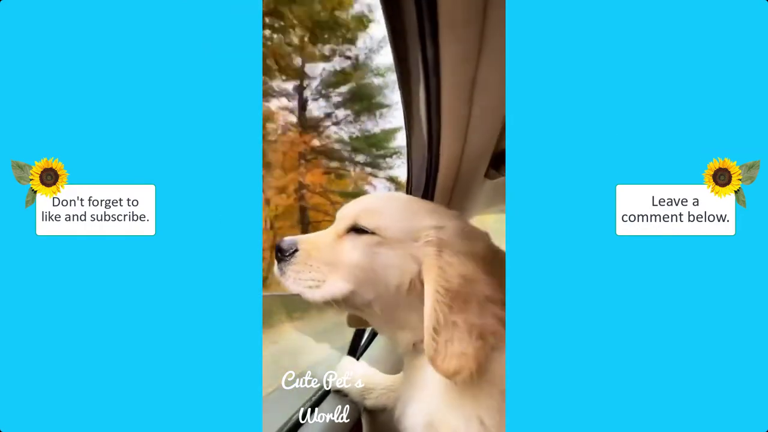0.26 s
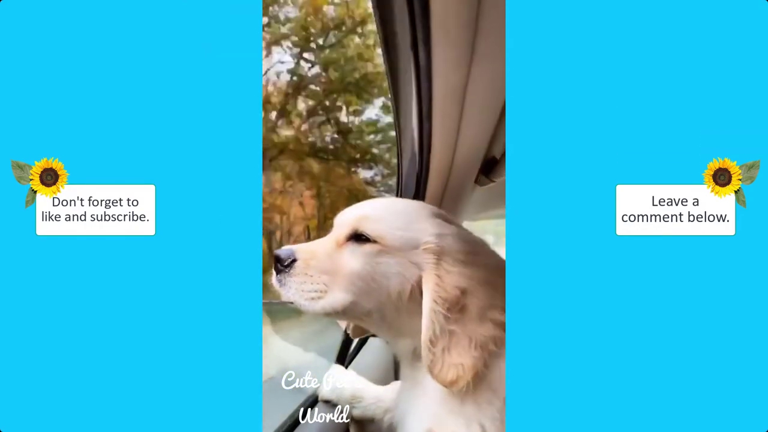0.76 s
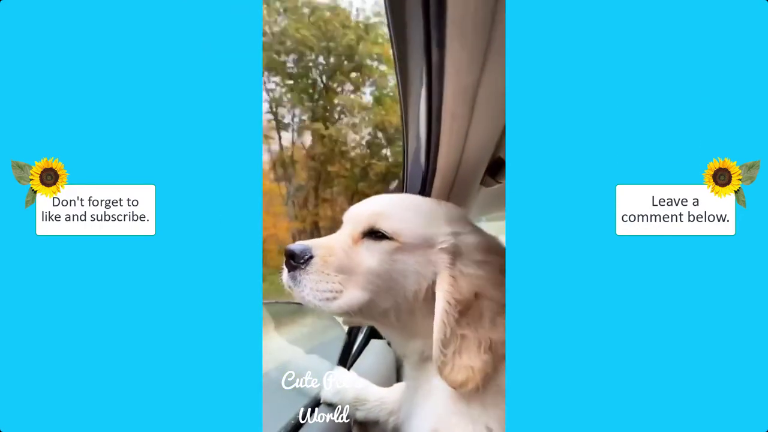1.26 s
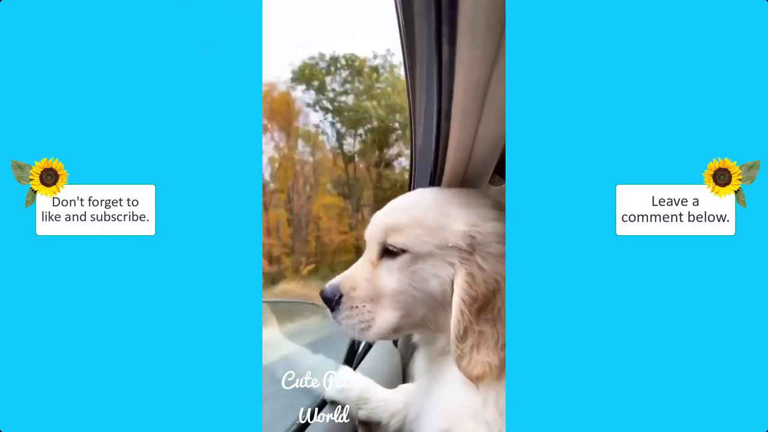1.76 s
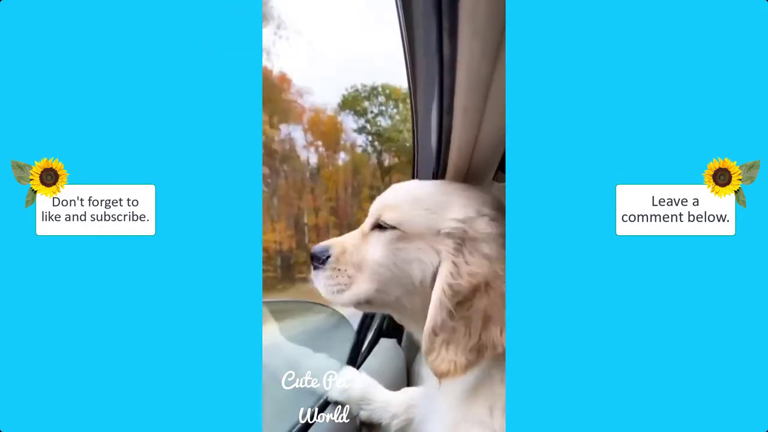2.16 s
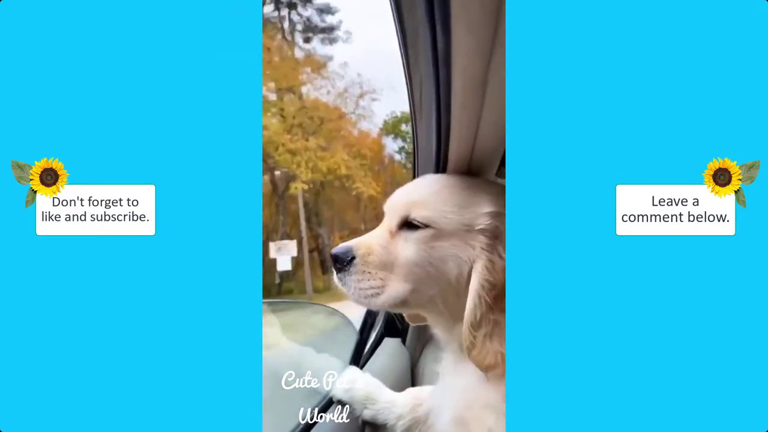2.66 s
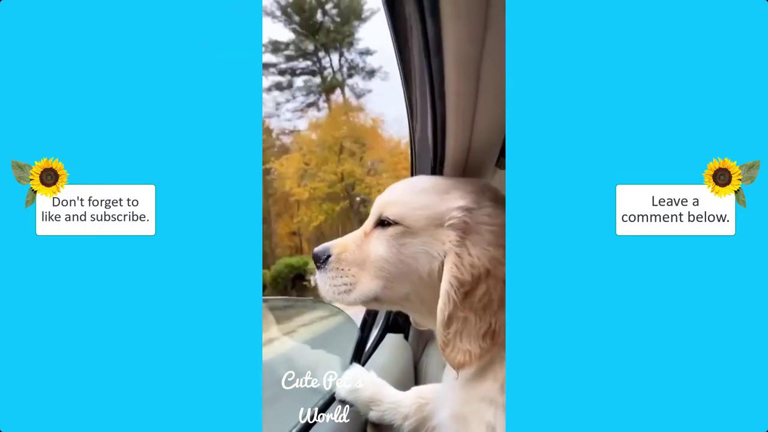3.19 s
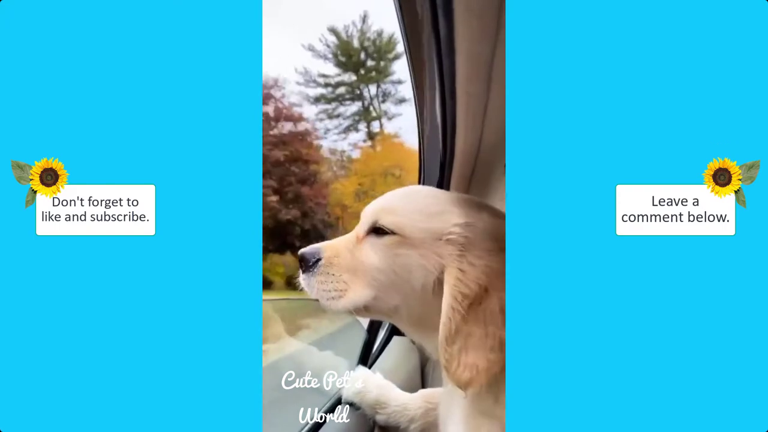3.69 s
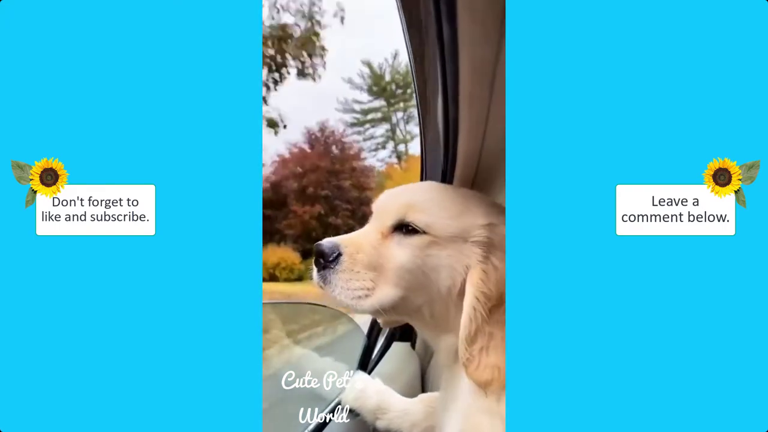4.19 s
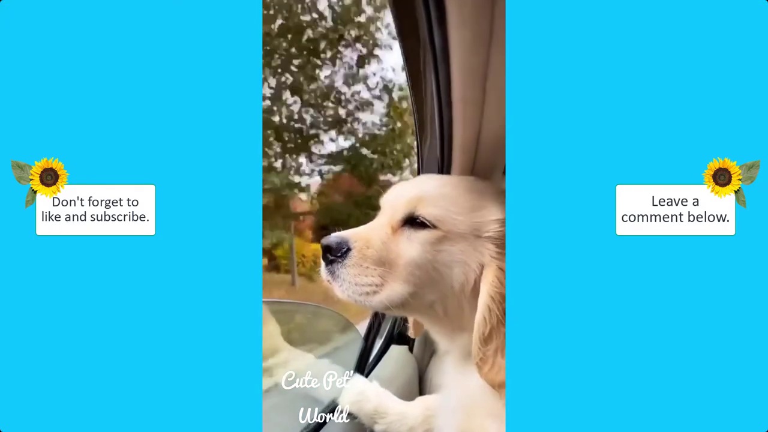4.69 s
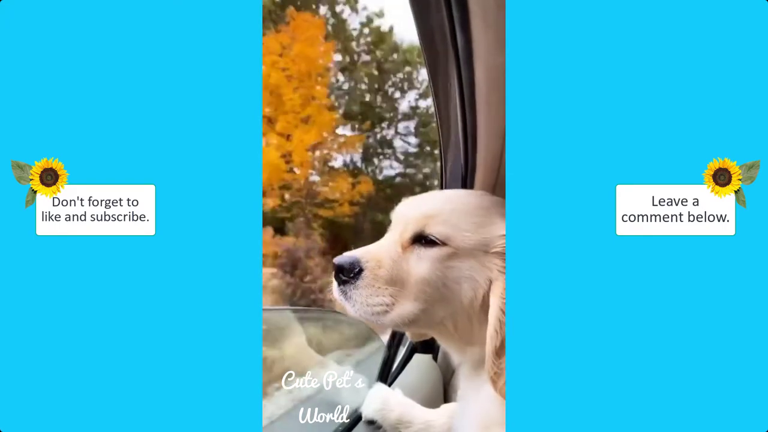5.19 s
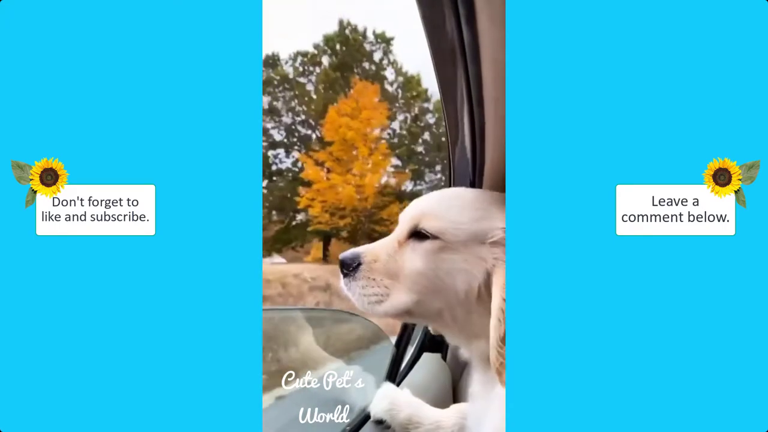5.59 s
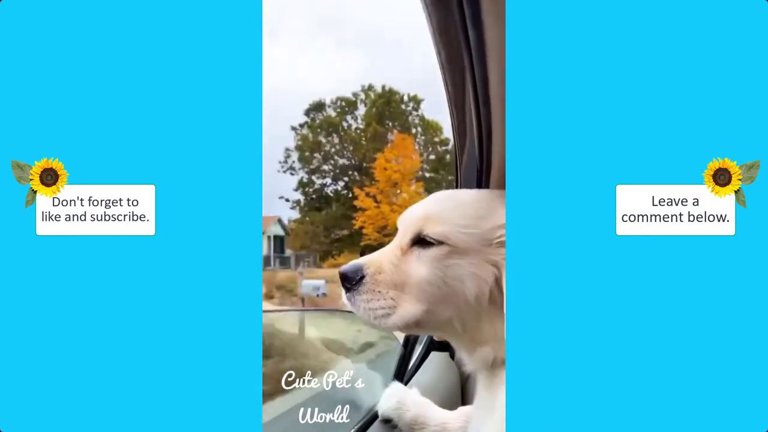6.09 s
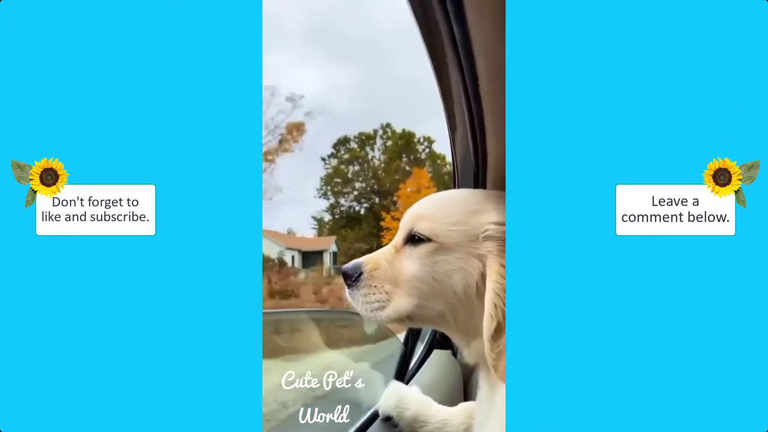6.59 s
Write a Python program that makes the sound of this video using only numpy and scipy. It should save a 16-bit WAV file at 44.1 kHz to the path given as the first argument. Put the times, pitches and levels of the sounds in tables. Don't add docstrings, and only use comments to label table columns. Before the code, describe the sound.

A phone in a car cabin picks up dominant, irregular deep wind buffeting, slightly squeezed at its peaks. Steady tyre rumble and quiet wind hiss sit behind it. A brief hollow rush swells and cuts off at about two seconds. The loose window pane ticks singly at first, knocks hard at three seconds, then chatters late while a thin breathy whistle grows faintly. The dog is silent.

```python
import sys
import numpy as np
from scipy import signal
from scipy.fft import rfft, irfft, next_fast_len
from scipy.io import wavfile
from scipy.ndimage import uniform_filter1d, map_coordinates

SR = 44100
rng = np.random.default_rng(int(sys.argv[2]) if len(sys.argv) > 2 else 0)


def wav_record(signal):
    frames = np.transpose(np.atleast_2d(signal))
    bounded = np.clip(frames, -1, 1)
    quanta = np.round(bounded * 32767).astype(np.int16)
    wavfile.write(sys.argv[1], SR, quanta)


def boost_factor(decibels):
    exponent = np.asarray(decibels, float) / 20
    return 10 ** exponent


N = 302085
TIME = np.arange(N) / SR


def unit(x):
    return x / np.sqrt(np.mean(x ** 2) + 1e-20)


def curves(rows):
    s, *columns = np.transpose(rows)
    return [np.interp(TIME, s, column) for column in columns]


def wobble(rate):
    knots = rng.standard_normal(int(N * rate / SR) + 4)
    return map_coordinates(knots, [np.arange(N) * rate / SR])


def phase(hz):
    return 2 * np.pi * np.cumsum(hz) / SR


def tent(peak_s, rise_db_per_s, fall_db_per_s):
    t = TIME - peak_s
    return np.where(t < 0, rise_db_per_s * t, -fall_db_per_s * t)


def filtered(x, response):
    m = next_fast_len(N + SR // 2)
    return irfft(rfft(x, m) * response(np.fft.rfftfreq(m, 1 / SR)), m)[:N]


def resonant(modes):
    def response(f):
        total = 0
        for k, (centre, width, db) in enumerate(modes):
            damping = 1j * f * width
            total = total + (-1) ** k * boost_factor(db) * damping / (centre * centre - f * f + damping)
        return total
    return response


def narrow_noise(centre_hz, width_hz):
    response = resonant([(centre_hz, width_hz, 0)])
    return unit(filtered(rng.standard_normal(N), lambda f: response(f) ** 2))


def rush(spectrum, patchy_db):
    z = signal.stft(rng.standard_normal(N), nperseg=512)[2]
    field = uniform_filter1d(rng.standard_normal(z.shape), 6, 0)
    field = uniform_filter1d(field, 12, 1)
    noise = signal.istft(z * boost_factor(patchy_db * unit(field)), nperseg=512)[1][:N]
    f, db = np.transpose(spectrum)
    return unit(filtered(noise, lambda hz: boost_factor(np.interp(np.log(hz + 1), np.log(f + 1), db))))


# (time [s], level [dB])
SUCTION = [(0, -36), (.3, -24), (.8, -25.5), (1.25, -35), (1.55, -30), (2.0, -44), (2.6, -38), (3.0, -32),
           (3.5, -25.5), (3.9, -25.5), (4.3, -24), (4.8, -33), (5.2, -33), (5.6, -19.5), (6.0, -39),
           (6.25, -23), (6.55, -42), (6.85, -34)]
# (time [s], pitch [Hz], peak level [dB])
THROBS = [(0.095, 70.1, -17), (0.167, 77.2, -18.5), (0.258, 68.7, -16), (0.332, 73.3, -10),
          (0.459, 71.9, -16.5), (0.592, 72.5, -11.5), (0.728, 70.5, -13.5), (0.792, 73.6, -27),
          (0.92, 71.6, -12), (1.099, 67.5, -17), (1.207, 72.8, -11.5), (1.426, 69.54, -17),
          (1.539, 82, -16.5), (1.647, 75.6, -12.5), (1.72, 76.6, -10.5), (1.884, 76.6, -14.5),
          (1.984, 76, -21), (2.075, 69.6, -12), (2.223, 76.6, -19), (2.346, 76, -10.5), (2.562, 80.2, -20),
          (2.687, 73.15, -19), (2.812, 68.2, -16), (2.904, 71.4, -13), (2.972, 75.7, -15),
          (3.09, 76.8, -14), (3.203, 76.33, -17), (3.279, 74.6, -17), (3.358, 69.54, -23),
          (3.443, 66.7, -20), (3.562, 73.9, -13.5), (3.708, 71.8, -14.5), (3.777, 77.66, -17),
          (3.857, 69.3, -23), (3.949, 70.1, -9.5), (4.028, 70.3, -14.5), (4.141, 71.3, -14),
          (4.218, 77.5, -15), (4.337, 69.5, -21), (4.423, 72.2, -13.5), (4.508, 73.5, -13.5),
          (4.584, 72.2, -32), (4.784, 76.2, -18.5), (4.947, 72.6, -21.5), (5.149, 74.7, -16),
          (5.305, 75.34, -17), (5.41, 71.4, -17), (5.47, 68.6, -19), (5.598, 72.2, -19), (5.731, 74.5, -15),
          (5.868, 75.4, -12.5), (6.025, 69.65, -15.5), (6.175, 83.1, -15), (6.245, 80.04, -23),
          (6.332, 77.6, -18), (6.426, 69, -11.5), (6.558, 79.2, -17.5), (6.617, 73.3, -27),
          (6.693, 67.7, -14), (6.792, 74.8, -10)]


def boom():
    fall_db_per_s, hold_s = 313, 0.011
    swing_share_db = -5.5
    hz = curves(THROBS)[0] + 2.33 * wobble(7)
    slip = 1.1 * wobble(20)
    db = curves(SUCTION)[0] + np.minimum(4 * wobble(31), 2)
    for s, _, peak_db in THROBS:
        centre = round(s * SR)
        near = np.arange(max(centre - SR // 10, 0), min(centre + SR // 10, N))
        swing_db = np.minimum(fall_db_per_s * (hold_s - np.abs(near / SR - s)), 0)
        db[near] = np.maximum(db[near], peak_db + swing_share_db + swing_db)
    return boost_factor(db) * np.sin(phase(hz) + slip)


def engine():
    crank_hz, crank_db, load_db_per_s = 26.97, -41.5, 1.5
    turn = phase(crank_hz + 0.264 * wobble(1.465))
    throb_db = crank_db + load_db_per_s * TIME + 2.1 * wobble(2.4)
    throb = boost_factor(throb_db) * np.sin(turn + 0.45 * wobble(35))
    firing = boost_factor(-44.0 + 0.74 * wobble(2.8)) * np.sin(4 * turn)
    return throb + firing


# (centre [Hz], width [Hz], level [dB])
PASSING_TONE = [(1220, 91, 0.5), (1746, 274, 0.5), (1960, 230, 1.5), (2139, 200, -2.5), (3420, 1500, -18.5)]


def passing():
    peak_s, hold_s, rush_db = 1.808, 0.095, -41.5
    nearing_db_per_s, gone_db_per_s = 40, 170
    hollow_s, hollow_from_s, hollow_db = 1.914, 1.73, -39.5
    top_hz, top_s, arch_hz_per_s2 = 815, 1.83, 11000

    upper_db = rush_db + tent(peak_s, nearing_db_per_s, 0) + tent(peak_s + hold_s, 0, gone_db_per_s)
    upper_db = upper_db + 0.5 * wobble(40.7)
    upper = unit(filtered(rng.standard_normal(N), resonant(PASSING_TONE)))

    hollow_db = hollow_db + tent(hollow_s, 12, 2 * gone_db_per_s) + tent(hollow_from_s, gone_db_per_s, 0)
    arch_hz = np.maximum(top_hz - arch_hz_per_s2 * (TIME - top_s) ** 2, 600)
    note = np.sin(phase(arch_hz + 18 * wobble(60)))
    hollow = unit(0.8 * narrow_noise(770, 200) + note)
    return boost_factor(upper_db) * upper + boost_factor(hollow_db) * hollow


# (time [s], peak level [dB], dull part [dB], spring ring [dB])
TICKS = [(1.2568, -32, -15, -16), (1.9305, -29.5, -18, -16), (3.0772, -26, -16, -16), (3.094, -49, 6, -10),
         (5.59, -32.5, -19, -19), (5.6062, -30.5, -11, -18), (5.8840, -31.5, -12, -10),
         (5.894, -28, -8, -18), (5.9058, -31, -12, -16), (5.918, -27.5, -23, -17), (5.972, -27.5, -15, -18),
         (5.9858, -31, -19, -20), (5.9976, -33, -13, -23), (6.0099, -32, -24, -21),
         (6.026, -28.5, -25, -17), (6.5357, -27.5, -14, -18), (6.5462, -37, -1, -16),
         (6.5878, -27, -6.5, -14), (6.635, -37, 0, -19), (6.7052, -31, -12, -16), (6.7142, -33, -7, -13),
         (6.7605, -46, 2, -16), (6.771, -39, -8, -14), (6.7767, -28.5, 1, -8), (6.7874, -29, -1, -10),
         (6.81, -40, 5, -14), (6.8474, -38, -3.5, -17), (3.0802, -30, -5, -6), (6.658, -41, -4, -18)]
TICK_HZ = [8720, 4190, 11070, 3490, 7000, 7450, 5920, 9500, 8000, 8580, 9800, 7200, 9300, 9700, 9500, 12030,
           9000, 7300, 9070, 7700, 7660, 3022, 6000, 3000, 2900, 2900, 8010, 5840, 6500]
# (centre [Hz], width [Hz], level [dB])
PANE = [(3740, 630, -2.5), (7130, 1560, 1.5), (9300, 2100, 1), (11700, 3600, -2.5)]
# (centre [Hz], width [Hz], level [dB])
FRAME = [(680, 960, 1.5), (1190, 680, 12.5), (1680, 1130, 12), (3170, 1030, 6)]


def ticks():
    crack_t60_s, chink_t60_s, rustle_t60_s = 0.0078, 0.0035, 0.11
    first_touch_db, chink_db = 2.5, -1
    contact_lag_s, dull_lag_s = 0.0004, 0.00044
    t = np.arange(SR // 20) / SR
    bright, dull, ring, chink = np.zeros((4, N + SR))
    grains = rng.standard_normal((len(TICKS), 3, len(t)))
    touch = 1 + boost_factor(first_touch_db - 60 * t / 0.0018)
    push = 3.2 * boost_factor(-60 * t / 0.004)
    spring_tone = 0.3 * np.sin(2 * np.pi * 4350 * t)
    for (s, db, dull_db, ring_db), hz, grain in zip(TICKS, TICK_HZ, grains):
        s += contact_lag_s
        here = slice(round(s * SR), round(s * SR) + len(t))
        later = round((s + dull_lag_s) * SR)
        crack = boost_factor(db - 60 * t / crack_t60_s) * (1 - np.exp(-t / 0.00059))
        crack += boost_factor(db - 22.5 - 60 * t / rustle_t60_s) * (1 - np.exp(-t / 0.0023))
        bright[here] += crack * grain[0] * touch
        chink_level = boost_factor(db + chink_db - 60 * t / chink_t60_s) * (1 - np.exp(-t / 0.00025))
        chink[here] += chink_level * np.sin(2 * np.pi * hz * t)
        dull[later:later + len(t)] += boost_factor(dull_db) * crack * (0.61 * grain[1] + push)
        ring[here] += boost_factor(ring_db) * crack * (grain[2] + spring_tone)
    glass = boost_factor(6) * filtered(bright[:N], resonant(PANE))
    trim = boost_factor(11.5) * filtered(dull[:N], resonant(FRAME))
    spring = boost_factor(17) * filtered(ring[:N], resonant([(4320, 420, 0)]))
    return chink[:N] + glass + trim + spring


# (frequency [Hz], level [dB], T60 [s])
KNOCK_MODES = [(1750, 0, .02), (2800, -9, .015), (4380, -1, .022), (5900, -4, .014), (7700, -2, .007),
               (11200, -1, .007)]


def knock():
    knock_s, knock_db = 3.0779, -29.5
    t = np.maximum(TIME - knock_s, 0)
    out = np.zeros(N)
    for hz, db, t60 in KNOCK_MODES:
        onset = 1 - np.exp(-t * hz / 3)
        out += boost_factor(knock_db + db - 60 * t / t60) * onset * np.sin(2 * np.pi * hz * t)
    return out


def snap():
    start_s, length_s, level_db = 1.9306, 0.0022, -29
    from_hz, to_hz = 6500, 1500
    u = np.clip((TIME - start_s) / length_s, 0, 1)
    hz = from_hz * (to_hz / from_hz) ** u
    return boost_factor(level_db) * np.sin(np.pi * u) * np.sin(phase(hz * (u > 0)))


# (time [s], level [dB], centre [Hz])
PUFFS = [
    (0.7, -55, 9640),
    (2.6, -54, 3583),
    (2.695, -51.5, 3224),
    (2.955, -53, 2800),
    (6.66, -63, 6500),
    (6.795, -53, 2800),
    (3.083, -47, 1748),
]


def puffs():
    air = rng.standard_normal(N)
    out = np.zeros(N)
    for s, db, hz in PUFFS:
        jet = unit(filtered(air, resonant([(hz, 0.15 * hz, 0)])))
        out += boost_factor(db + tent(s, 350, 350)) * jet
    return out


# (time [s], pitch [Hz], level [dB])
WHINE = [
    (0, 1700, -61),
    (2.6, 1700, -58),
    (4.3, 1720, -54),
    (5.15, 1690, -55),
    (5.58, 1710, -48),
    (5.72, 1720, -54),
    (6.15, 1730, -50.5),
    (6.45, 1725, -51.5),
    (6.85, 1720, -52),
]


def whistle():
    change_s, blend_s = 3.6, 0.58
    low_slot_db, idle_slot_db = -53.5, -18
    width_hz = 130
    moved = 1 / (1 + np.exp((change_s - TIME) / blend_s))
    low_db = low_slot_db + idle_slot_db * moved + 0.65 * wobble(3.9)
    low = narrow_noise(1465, 210)
    hz, db = curves(WHINE)
    turn = phase(hz + 12 * wobble(14))
    high = unit((0.55 + wobble(width_hz)) * np.cos(turn) + wobble(width_hz) * np.sin(turn))
    return boost_factor(low_db) * low + boost_factor(db + 0.82 * wobble(11)) * high


# (frequency [Hz], density [dB per Hz])
BUFFET = [(12, -35), (20, -19), (27, -20), (34, -14), (40, -10), (60, -9), (85, -12), (110, -17.5),
          (160, -76)]


def buffeting():
    suction_db = curves(SUCTION)[0]
    suction_db = suction_db - suction_db.mean()
    return boost_factor(-28 + 0.1 * suction_db + 1.9 * wobble(12)) * rush(BUFFET, patchy_db=-1.14)


# (time [s], level [dB])
SURFACE = [(0, -0.5), (.45, 0.5), (.9, -0.5), (1.4, -0.5), (1.75, -1), (2.1, 1), (2.45, 0), (2.8, 1),
           (3.05, 1), (3.25, -1), (3.45, 1.5), (3.8, 0.5), (4.55, 0), (4.8, -1.5), (5.2, 0), (5.5, 0.5),
           (5.95, -0.5), (6.3, 1)]
# (frequency [Hz], density [dB per Hz])
ROAD = [(56, -7), (95, -4), (130, -5), (242, -15), (317, -14), (365, -17.5), (555, -22), (607, -26.5),
        (800, -37), (1040, -34), (1760, -120)]


def road_roar():
    return boost_factor(-28.5 + curves(SURFACE)[0] + 0.16 * wobble(4.4)) * rush(ROAD, patchy_db=0.58)


# (time [s], level [dB])
GUST = [(0, -53.5), (.3, -54.5), (.7, -55), (1.1, -55.5), (1.6, -55), (1.82, -51), (2.0, -53.5), (2.4, -55),
        (2.66, -53), (2.85, -53.5), (3.4, -54), (4.05, -52.5), (4.55, -52.5), (5.2, -54.5), (5.95, -53),
        (6.5, -53.5), (6.75, -53), (6.85, -52)]
# (frequency [Hz], density [dB per Hz])
EDGE = [(410, -17), (700, 2.5), (1030, -1.5), (1230, -4.5), (1550, -2.5), (1680, -3), (1870, -6),
        (2030, -7), (2210, -16.5), (2500, -20), (3250, -21.5), (5500, -120)]
# (frequency [Hz], density [dB per Hz])
HISS = [(1350, -8.5), (2300, -1), (3470, -1.5), (4400, -3.5), (4700, -6.5), (5250, -4.5), (6050, -7),
        (7300, -4.5), (8970, -10), (11900, -12.5), (13600, -18), (16000, -10.5)]


def window_air():
    gust_db = curves(GUST)[0]
    gust_db = gust_db - gust_db.mean()
    gust = wobble(7)
    edge_db = -44.5 + 0.41 * gust_db + 0.2 * gust
    hiss_db = -51 + 1.15 * gust_db + 0.13 * gust + 0.87 * wobble(30)
    return boost_factor(edge_db) * rush(EDGE, patchy_db=1.1) + boost_factor(hiss_db) * rush(HISS, patchy_db=1.42)


def scene():
    cabin = boom() + engine()
    pane = ticks() + knock() + snap() + puffs()
    air = whistle() + buffeting() + road_roar() + window_air()
    return (cabin + passing() + pane + air)[None]


# (frequency [Hz], share of cells lost [0-1])
DROPPED = [(5500, 0), (8000, .002), (10500, .008), (12000, .03), (13000, .1), (14000, .3)]


def thinned(x):
    hz, t, z = signal.stft(x, SR, nperseg=1024)
    cells = rng.random((len(hz) // 8 + 1, len(t) // 2 + 1))
    cells = np.repeat(np.repeat(cells, 8, 0), 2, 1)[:len(hz), :len(t)]
    kept = cells > np.interp(hz, *np.transpose(DROPPED))[:, None]
    luck = np.repeat(rng.standard_normal(len(t) // 2 + 1), 2)[:len(t)]
    kept &= hz[:, None] < np.maximum(13750 + 650 * luck, 12900)
    treble_db = 10 * np.log10(np.mean(np.abs(z[hz > 6000]) ** 2, 0) + 1e-20)
    kept |= treble_db > np.median(treble_db) + 4
    return signal.istft(z * kept, SR, nperseg=1024)[1][:N]


def roll_off(x):
    return signal.sosfilt(signal.butter(12, 14750, fs=SR, output="sos"), x)


def record(dry):
    squeezed = dry / (1 + np.abs(dry / 0.45) ** 4) ** (1 / 4)
    cut = filtered(squeezed[0], lambda hz: 1 / (1 + (hz / 13950) ** 150) + 0.03 * (hz < 14750))
    cut = filtered(cut, lambda hz: 1 / (1 + (18 / (hz + 1)) ** 4))
    mix = thinned(cut)[None]
    return roll_off(mix)


dry = scene()
out = record(dry)
wav_record(out)
```